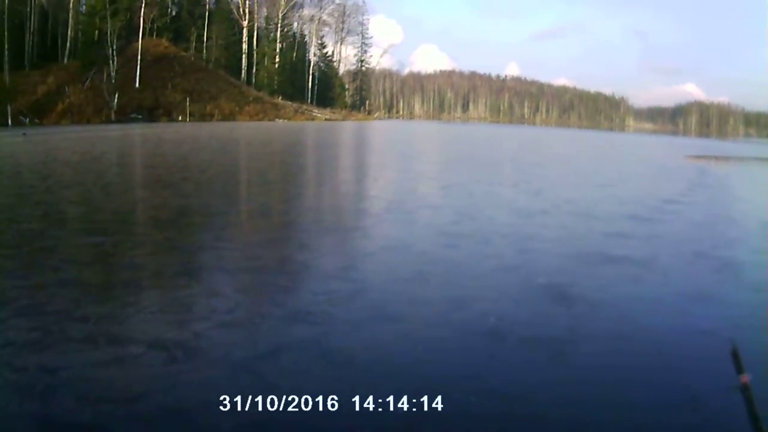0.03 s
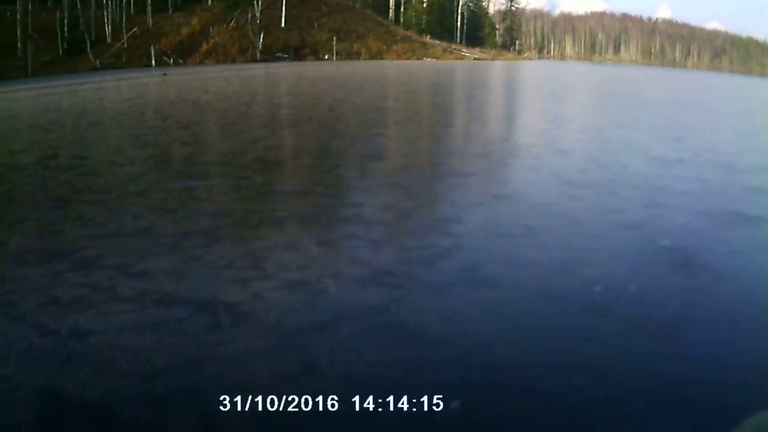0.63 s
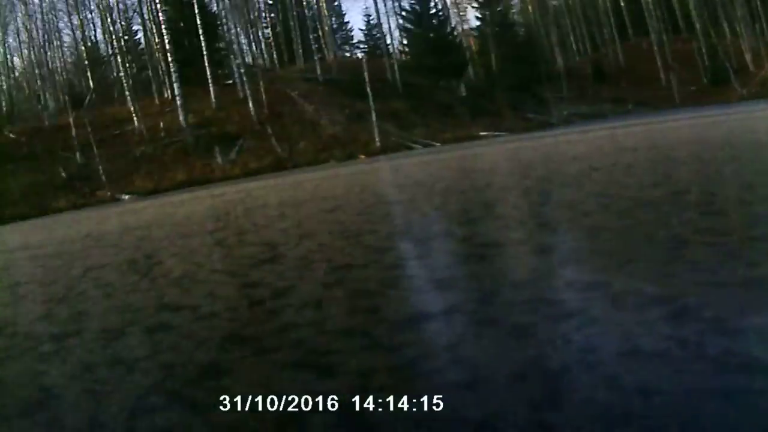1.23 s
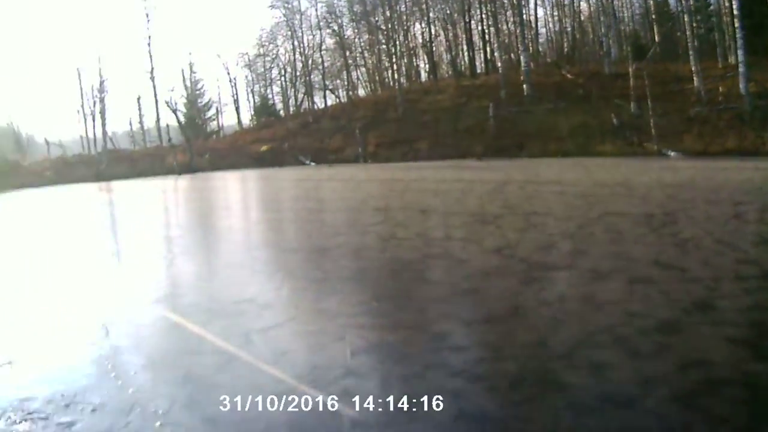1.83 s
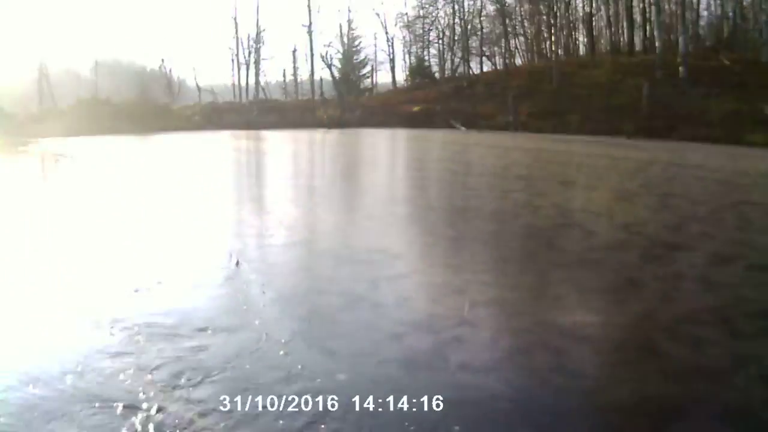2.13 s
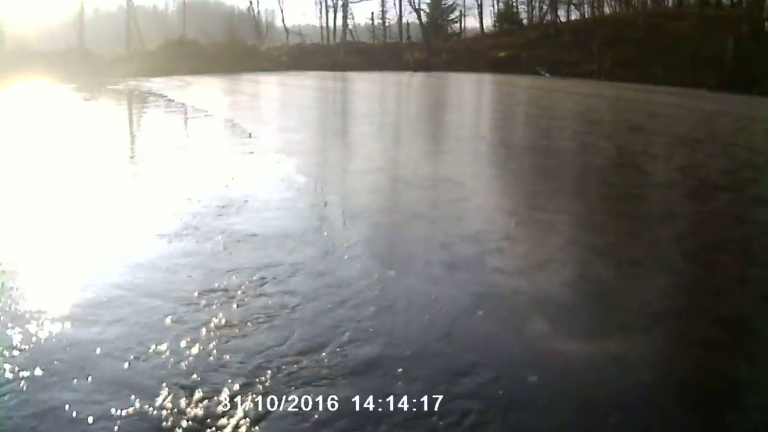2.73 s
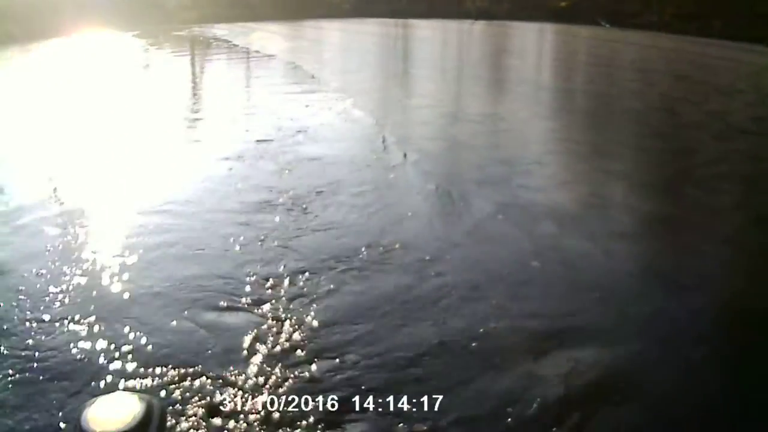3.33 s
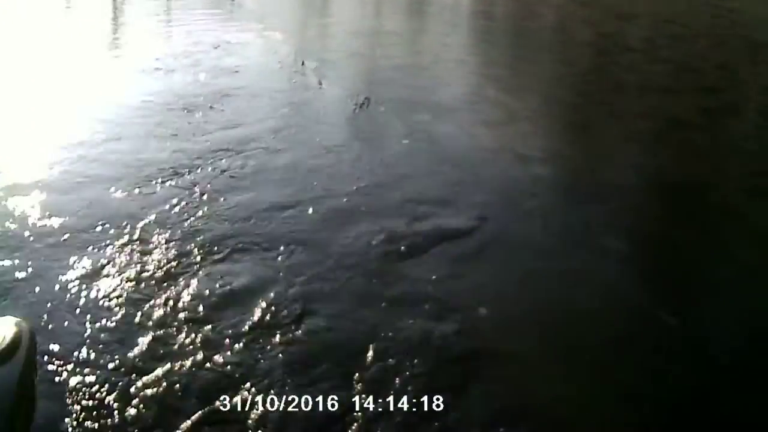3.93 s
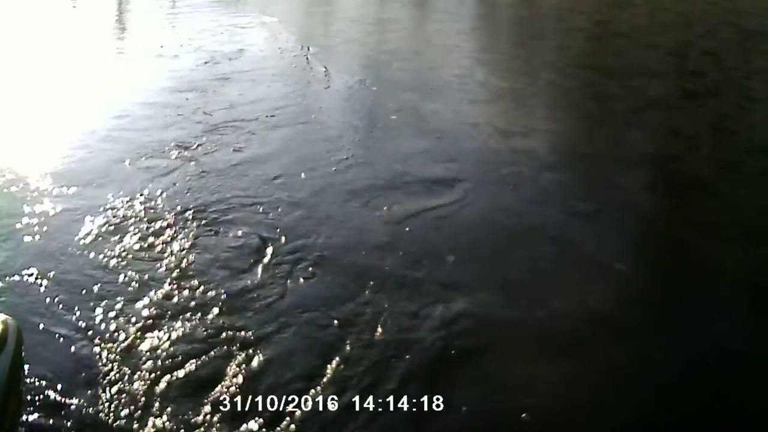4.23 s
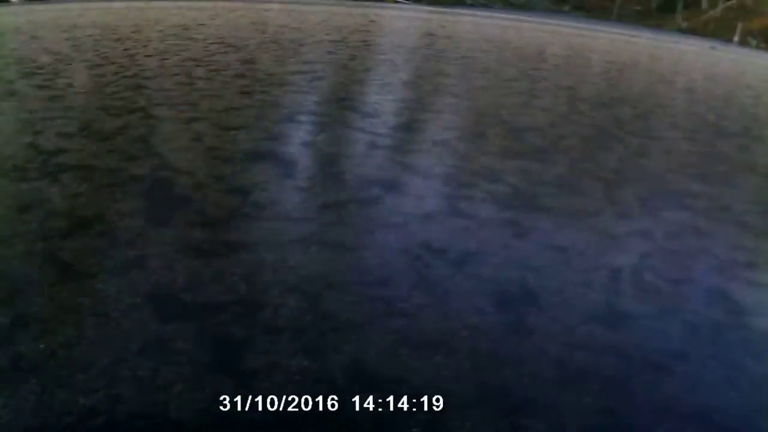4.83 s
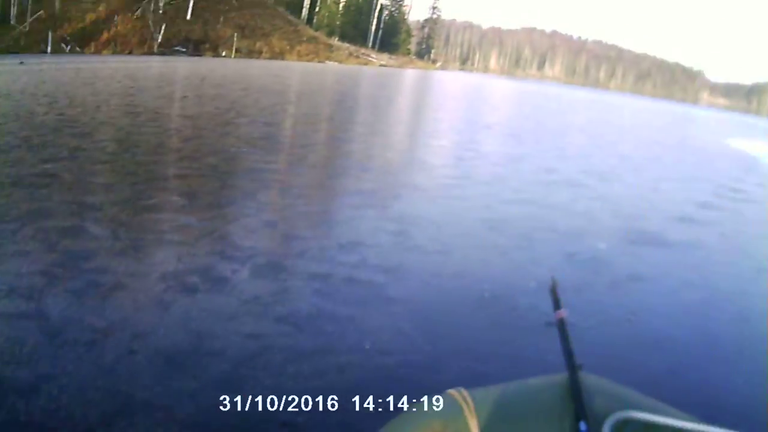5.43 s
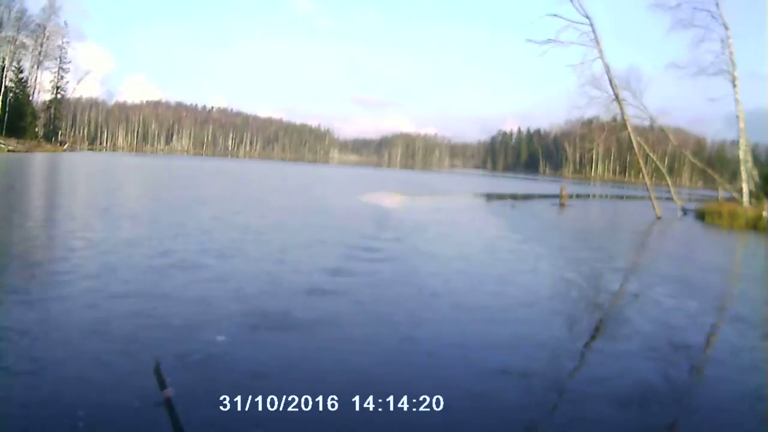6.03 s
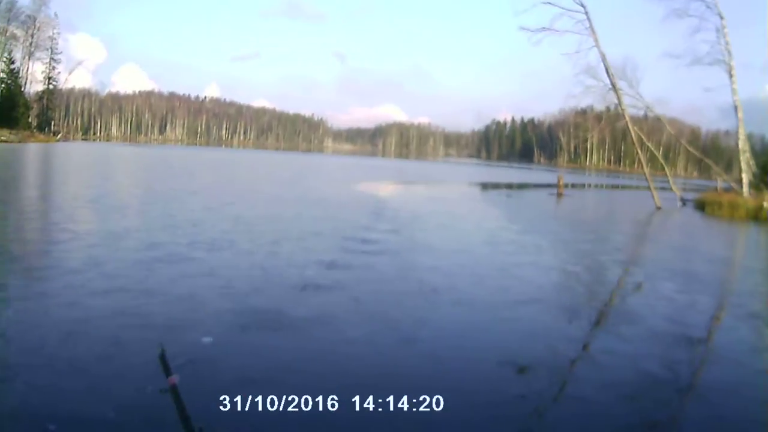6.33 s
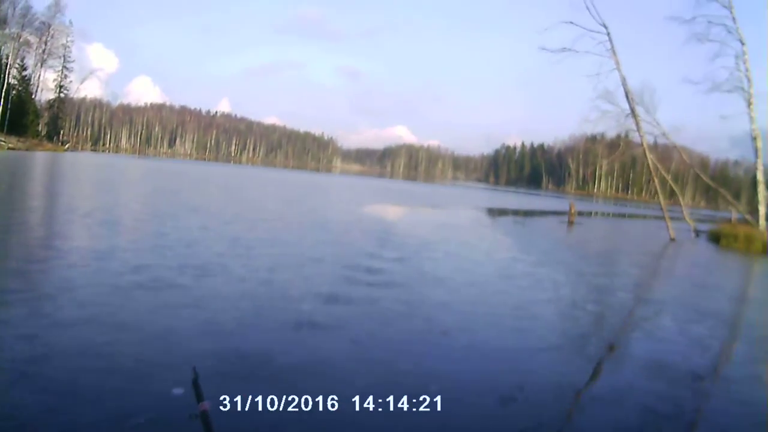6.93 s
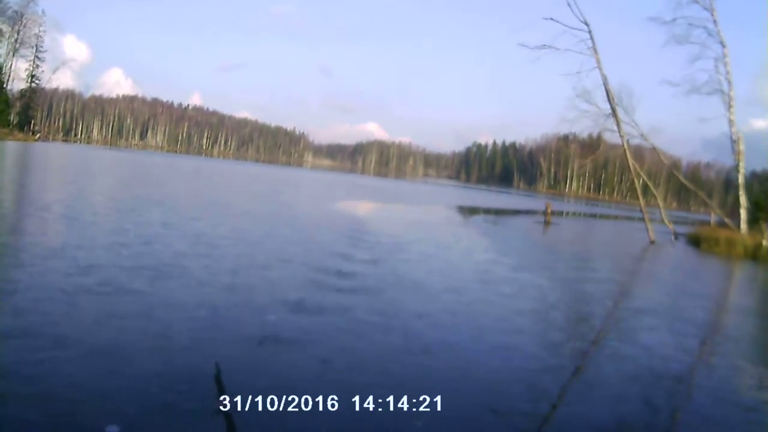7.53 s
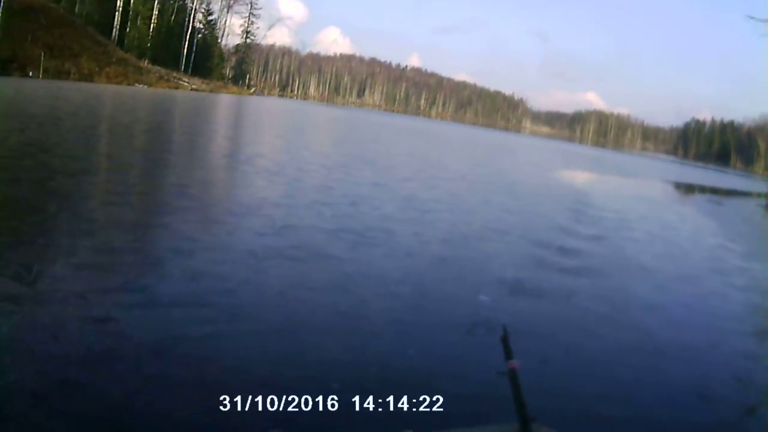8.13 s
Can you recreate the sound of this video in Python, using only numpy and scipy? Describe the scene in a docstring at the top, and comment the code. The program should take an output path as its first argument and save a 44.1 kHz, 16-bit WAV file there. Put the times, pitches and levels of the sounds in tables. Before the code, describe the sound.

Muffled crunching of thin ice and hollow thumps on an air-filled hull are heard from aboard a small boat on a lake. The crunch dies down as the quiet electric motor stops, and the wake bubbles. After a brief clothing rustle and a low buffet of air on the microphone, the hum resumes and the ice cracks and knocks harder. A faint electronic hiss lies underneath.

```python
"""Ice crunches and drums on an air-filled hull: an inflatable boat ploughs through a thinly frozen lake.
Its quiet electric motor hums, rests while the boat coasts, then spins up again.
The on-board camera swings astern and back: the wake gurgles, air buffets the case, a jacket rustles.
The closed case muffles ice and water above the midrange; the electronics hiss and tick faintly."""
import sys
import numpy as np
from scipy import signal
from scipy.fft import rfft, irfft
from scipy.io import wavfile

SR = 44100
rng = np.random.default_rng(int(sys.argv[2]) if len(sys.argv) > 2 else 0)


def dump_mix(stems):
    """Bounce the given channels to the path in sys.argv[1] as a 16-bit WAV at rate SR."""
    frames = np.atleast_2d(stems).T  # one column per channel
    limited = np.clip(frames, -1, 1)  # hard clip at full scale
    pcm = np.round(limited * 32767).astype(np.int16)
    wavfile.write(sys.argv[1], SR, pcm)


N = 360297
TIME = np.arange(N) / SR

# bow load on the ice, as crunch level: t/s, level/dB
ICE_LOAD = [(0, -47), (0.45, -50.5), (0.78, -51), (1.0, -50), (1.27, -53), (1.52, -49.5), (1.7, -54),
            (2.3, -60.5), (3.5, -71), (4.5, -62), (4.95, -55), (5.9, -51.5), (6.22, -53), (6.45, -49.5),
            (7.48, -47), (7.93, -55), (8.17, -47)]
# patches of ice giving way: centre t/s, length/s, level/dB
COLLAPSES = [(0.41, 0.086, -46), (4.9, .06, -55), (5.0, 0.04, -51), (5.18, .07, -52), (5.36, 0.11, -50.5),
             (7.16, 0.028, -46), (7.435, 0.034, -52)]
# fracture spectrum: f/Hz, gain/dB
CRUNCH_SPECTRUM = [(300, -10), (500, -7.5), (720, 0), (900, -0.5), (1080, 2), (1380, -1), (1600, -1.5),
                   (2000, -8), (2800, -4), (4500, -8.5), (6500, -30), (10000, -35), (16000, -26.5)]
# air-filled hull: f/Hz, width/Hz, gain/dB
HULL_MODES = [(93.2, 63, 0), (108, 34, -6.5), (171, 31, -9.5), (195, 62.5, 0.5), (258, 46.8, -1.5),
              (335, 85, -8), (426, 90, -10), (617, 122, -22.5)]
# slabs sliding under the hull: centre t/s, length/s, level/dB
SLABS = [(0.11, 0.098, -48), (0.62, 0.083, -41), (0.98, 0.086, -42), (4.06, 0.11, -56.5),
         (4.5, 0.063, -43.5), (4.68, 0.28, -52.5), (5.82, 0.16, -44.5), (6.55, 0.11, -39.5),
         (7.08, 0.45, -39.5), (7.8, 0.34, -45.5)]
# plates hitting the hull: t/s, peak before trim/dB
BUMPS = [(0.116, -35), (4.629, -35), (6.49, -36), (6.746, -33), (7.013, -30.5), (7.045, -32), (7.126, -30),
         (7.174, -27.5), (7.247, -26.5), (7.487, -27.5), (7.783, -25)]
# single cracks: t/s, peak/dB, f/Hz
CRACKS = [(0.442, -37, 950), (0.692, -35, 1090), (0.957, -36, 1210), (4.895, -34, 1200), (5.013, -38, 1070),
          (5.775, -34, 1090), (7.149, -30.5, 1650), (7.152, -30, 1240), (7.419, -32, 1170),
          (7.492, -37, 1370)]
# shards splintering: t/s, peak/dB, length/s
SPLINTERS = [(0.395, -46, .04), (0.97, -51, .12), (1.5, -50, .08), (1.87, -51, .06), (3.066, -52, .012),
             (5.9, -51, .03), (7.183, -47.5, .014), (7.42, -50, .03), (7.58, -50, .05)]
# water along the hull: f/Hz, gain/dB
WASH_SPECTRUM = [(100, 3.5), (250, 4.5), (450, 0.5), (700, -0.5), (1200, 4.5), (1600, 6), (3000, -3.5),
                 (8000, -6.5)]
# wake bubbles: t/s, peak/dB, f/Hz, t60/s
BUBBLES = [(2.889, -45, 774, .05), (2.965, -46.5, 624, .07), (3.062, -45, 1400, .03),
           (3.165, -43.5, 960, .05), (3.226, -47, 1500, .04), (3.306, -40, 745, .08),
           (3.358, -45, 900, .05), (3.393, -46.5, 1190, .04), (3.493, -48, 800, .06),
           (3.607, -42.5, 1200, .05), (3.719, -46.5, 1010, .05), (3.939, -46, 555, .08),
           (4.01, -46, 1000, .05), (4.231, -43, 1310, .07), (4.638, -42, 1080, .05)]
# churned water: f/Hz, width/Hz, gain/dB
CHURN_MODES = [(160, 57, 0), (364, 100, -0.5), (616, 200, -8.5)]
# breeze on the case: t/s, level/dB
BREEZE = [(0, -58), (1.9, -51), (2.25, -68), (2.7, -55), (3.9, -46.5), (5.4, -52), (8.17, -50)]
# wind rumble: f/Hz, gain/dB
WIND_SPECTRUM = [(20, 12), (45, 6), (80, 0), (130, -9.5), (200, -29), (400, -41), (600, -61), (2000, -66)]
# camera swings: centre t/s, length/s, air level/dB, hand level/dB
TURNS = [(1.702, 0.53, -46, -55), (4.46, 0.72, -40, -45)]
# hand-held case: f/Hz, width/Hz, gain/dB
CASE_MODES = [(45.3, 58, -4), (76.5, 34, -1), (127, 46, -3), (405, 51, -12.5)]
# jacket strokes: centre t/s, length/s, level/dB
RUBS = [(0.34, .12, -70), (1.1, 0.48, -66), (1.94, 0.25, -61), (2.13, 0.16, -62), (2.67, .08, -63),
        (3.89, 0.2, -52.5), (4.35, 0.21, -57)]
# cloth rustle: f/Hz, gain/dB
CLOTH_SPECTRUM = [(300, -16), (1200, 17.5), (1700, 11.5), (2300, -1), (2900, 0), (3500, 7.5), (4500, 1.5),
                  (7000, -3), (10000, -5.5), (12000, 0.5), (14500, 0), (15700, -5)]
# electronic hiss: f/Hz, gain/dB
HISS_SPECTRUM = [(100, -33), (1500, -18), (2100, 3), (2800, 9), (3500, 2), (5000, 1), (5600, 5.5),
                 (7100, 0.5), (8000, -2.5), (9600, 0.5), (11200, -18.5), (13800, -5.5), (15700, -48)]
# peaks in the hiss: f/Hz, width/Hz, gain/dB
HISS_HUMPS = [(6180, 230, -5), (6480, 180, -6.5), (8750, 280, -13.5)]
# electronic whine: f/Hz, rms level/dB
WHINE_TONES = [(2400, -82), (5743, -88), (5787, -87), (6421, -83), (7200, -93), (12812, -97)]
# spells of ticking: start/s, end/s, rate/Hz
TICK_SPELLS = [(1.68, 3.1, 14.9), (1.697, 3.1, 14.9), (3.15, 5.0, 29.9), (6.93, 8.15, 14.9)]

USUAL_LOAD_DB = -52.5


def ice(load_db, crunch_db=-2, chip_db=-5, chip_hz=(950, 1080, 1210, 1330, 1450), chip_width_hz=110):
    """Countless tiny fractures crunch under the bow; loose chips clink among them."""
    level = np.hypot(from_db(load_db), swells(COLLAPSES, steepness=1.8))
    fractures = grains(per_s=2500, spread_db=3.5, clump_db=2)
    crunch = rms_one(through_case(colour(fractures, CRUNCH_SPECTRUM)))
    chips = sum(resonate(grains(per_s=45, spread_db=1, clump_db=1.5), [(hz, chip_width_hz, 0)])
                for hz in chip_hz)
    return level * (from_db(crunch_db) * crunch + from_db(chip_db) * rms_one(through_case(chips)))


def hull(extra_load_db, drum_db=-47, load_slope=1.2, coast_db=-4, screened_db=-2.5,
         bump_trim_db=-2, contact_s=0.0065):
    """Shards drum on the hull, harder with load and over slabs, screened from astern; plates bump it."""
    steady_db = drum_db + load_slope * extra_load_db + coast_db * coasting() + screened_db * astern()
    level = np.hypot(from_db(steady_db), swells(SLABS, steepness=2.8))
    shards = grains(per_s=1000, spread_db=2, clump_db=2)
    out = level * rms_one(resonate(shards, HULL_MODES))
    t = TIME[:SR // 8]
    for s, db in BUMPS:
        scrape = rng.standard_normal(len(t)) * np.exp(-t / contact_s)
        add(out, s, db + bump_trim_db, resonate(butter(scrape, 2, 800), HULL_MODES))
    return out


def cracks(t60_s=0.015, snap_s=0.0014, snap_hz=(700, 1600)):
    """A big crack snaps and rings briefly."""
    out = np.zeros(N)
    for s, db, hz in CRACKS:
        ring = ping(hz, t60_s)
        snap = burst(len(ring), 3, snap_hz, snap_s)
        add(out, s, db, through_case(ring + snap))
    return out


def splinters(band_hz=(2300, 4600)):
    """Thin shards give way in quick runs of bright clicks."""
    out = np.zeros(N)
    clicks = butter(grains(per_s=900, spread_db=2, clump_db=0) + 1e-18, 2, band_hz, "band")
    for s, db, length_s in SPLINTERS:
        add(out, s, db, clicks[int(s * SR):int((s + length_s) * SR)])
    return out


def tink(at_s=1.416, peak_db=-51, hz=4850, t60_s=0.03):
    """Something small and hard rings once."""
    out = np.zeros(N)
    add(out, at_s, peak_db, ping(hz, t60_s))
    return out


def wake(wash_db=-58, splash_s=0.0036, splash_hz=(600, 1900), small_db=-57, small_count=60):
    """Water washes along the hull; bubbles pinch off with a splash and ring with rising pitch."""
    wash = colour(grains(per_s=3000, spread_db=2, clump_db=2.5), WASH_SPECTRUM)
    out = from_db(wash_db) * rms_one(through_case(wash))
    for s, db, hz, t60_s in BUBBLES:
        ring = ping(hz, t60_s, rise=0.047)
        splash = 0.9 * burst(len(ring), 2, splash_hz, splash_s)
        add(out, s, db, through_case(ring + splash))
    for when, pitch, strength in rng.random((small_count, 3)):  # fainter bubbles, heard astern
        hz = 520 * 3 ** pitch
        add(out, 2.1 + 2.7 * when, small_db + 6 * strength, ping(hz, t60_s=25 / hz, rise=0.08))
    return out


def propeller(churn_db=-57):
    """The running propeller churns the water, heard from astern."""
    churn = resonate(grains(per_s=1500, spread_db=-0.5, clump_db=1.5), CHURN_MODES)
    return from_db(churn_db) * astern() * (1 - coasting()) * rms_one(through_case(churn))


def motor(extra_load_db, hum_hz=164, hum_db=-60, load_slope=0.26, wander=0.0304, waver_db=2.5):
    """The submerged electric motor gives a wavering hum, louder under load."""
    hz = hum_hz * (1 + wander * drift(4.8))
    phase = 2 * np.pi * np.cumsum(hz) / SR
    level = from_db(hum_db + load_slope * extra_load_db + waver_db * drift(6))
    return (1 - coasting()) * level * np.sqrt(2) * np.sin(phase)


def wind(lump_db=1, low_cut_hz=12):
    """Eddies on the case give a lumpy rumble that swells as the camera swings."""
    eddies = rng.standard_normal(N) * from_db(lump_db * drift(3.3))
    rumble = butter(colour(eddies, WIND_SPECTRUM), 3, low_cut_hz, "high")
    rush = swells([(s, length_s, air_db) for s, length_s, air_db, _ in TURNS], steepness=2.1)
    return np.hypot(from_db(in_time(BREEZE)), rush) * rms_one(rumble)


def handling(stretch=1.02, lag_s=0.16, top_hz=700):
    """Fingers stick and slip on the case in dull thumps as the hand brakes each turn."""
    slips = resonate(grains(per_s=260, spread_db=1.5, clump_db=3.5), CASE_MODES)
    grips = [(s + lag_s, stretch * length_s, hand_db) for s, length_s, _, hand_db in TURNS]
    return swells(grips, steepness=1.7) * rms_one(butter(slips, 2, top_hz))


def jacket():
    """Smooth threads slip over each other in a fine, bright rustle."""
    threads = grains(per_s=9000, spread_db=3, clump_db=1.2)
    return swells(RUBS, steepness=2.1) * rms_one(colour(threads, CLOTH_SPECTRUM))


def electronics(hiss_db=-66, hump_db=-69, wobble_rad=1.9,
                tick_db=-56, tick_s=0.0017, upper_hz=12520, lower_hz=10600):
    """Steady coloured hiss, a thin whine and spells of tiny two-tone ticks."""
    out = from_db(hiss_db) * rms_one(colour(rng.standard_normal(N), HISS_SPECTRUM))
    out += from_db(hump_db) * rms_one(resonate(rng.standard_normal(N), HISS_HUMPS))
    for hz, db in WHINE_TONES:
        out += from_db(db) * np.sqrt(2) * np.sin(2 * np.pi * hz * TIME + wobble_rad * drift(2.7))
    t = TIME[:int(tick_s * SR)]
    partials = np.sin(2 * np.pi * upper_hz * t) + from_db(-3) * np.sin(2 * np.pi * lower_hz * t)
    tick = np.hanning(len(t)) * partials
    for start_s, end_s, rate_hz in TICK_SPELLS:
        for s in np.arange(start_s, min(end_s, TIME[-1] - 0.02), 1 / rate_hz):
            add(out, s + 0.0004 * rng.normal(), tick_db + 1.8 * rng.normal(), tick)
    return out


def coasting(off_s=2.6, on_s=3.99, stop_s=0.033, spin_up_s=0.67):
    """1 with the motor off, 0 at full speed."""
    return np.clip(np.minimum((TIME - off_s) / stop_s, 1 - (TIME - on_s) / spin_up_s), 0, 1)


def astern(from_s=1, to_s=4.85, swing_s=0.36):
    """1 with the camera facing the stern, 0 facing the bow."""
    return np.clip(np.minimum(TIME - from_s, to_s - TIME) / swing_s + 0.5, 0, 1)


def through_case(x, cutoff_hz=1563, leak_hz=2300, leak_db=-14):
    """The case passes lows and mids; a little treble leaks in."""
    return butter(x, 10, cutoff_hz) + from_db(leak_db) * butter(x, 3, leak_hz, "high")


def grains(per_s, spread_db, clump_db):
    """Random clicks of uneven size, swelling in clumps."""
    born = rng.random(N) < per_s / SR
    size_db = spread_db * np.minimum(rng.exponential(1, N), 4) + clump_db * drift(19)
    return born * from_db(size_db) * rng.choice([-1, 1], N)


def ping(hz, t60_s, rise=0):
    """Decaying sine; pitch climbs by the fraction `rise`."""
    t = TIME[:int(t60_s * SR) + 2]
    return np.sin(2 * np.pi * hz * t * (1 + rise * t / t60_s / 2)) * from_db(-60 * t / t60_s)


def burst(samples, order, band_hz, decay_s):
    """Decaying band of noise."""
    noise = butter(rng.standard_normal(samples), order, band_hz, "band")
    return rms_one(noise) * np.exp(-TIME[:samples] / decay_s)


def drift(rate_hz, hop=40, settle=2000):
    """Slow random wander, unit rms."""
    r = np.exp(-2 * np.pi * rate_hz * hop / SR)
    noise = rng.standard_normal(N // hop + settle + 2)
    slow = signal.lfilter([1], [1, -2 * r, r * r], noise)[settle:]
    return np.interp(np.arange(N) / hop, np.arange(len(slow)), rms_one(slow))


def colour(x, spectrum):
    """Minimum-phase filter with the given spectrum."""
    hz, db = np.transpose(spectrum)
    grid_hz = np.linspace(0, SR / 2, 4097)
    gain = from_db(np.interp(np.log(grid_hz + 1), np.log(hz), db))
    cepstrum = irfft(np.log(gain))
    cepstrum[1:len(grid_hz) - 1] *= 2
    cepstrum[len(grid_hz):] = 0
    return signal.fftconvolve(x, irfft(np.exp(rfft(cepstrum))))[:N]


def resonate(x, modes):
    """Parallel resonances of alternating sign."""
    out = 0
    for k, (hz, width_hz, db) in enumerate(modes):
        r = np.exp(-np.pi * width_hz / SR)
        gain = (-1) ** k * from_db(db) * (1 - r * r) / 2
        feedback = [1, -2 * r * np.cos(2 * np.pi * hz / SR), r * r]
        out = out + signal.lfilter([gain, 0, -gain], feedback, x + 1e-18)
    return out


def butter(x, order, hz, kind="low"):
    """Maximally flat filter."""
    return signal.sosfilt(signal.butter(order, hz, kind, fs=SR, output="sos"), x)


def swells(rows, steepness):
    """Gain curve of rounded swells, summed in power."""
    power = 0
    for s, length_s, db in rows:
        falloff = np.minimum(np.abs(2 * (TIME - s) / length_s) ** steepness, 20)
        power += (from_db(db) * np.exp(-falloff)) ** 2
    return np.sqrt(power)


def add(out, s, peak_db, sound):
    """Mix a sound in at a given time and peak."""
    at = max(int(s * SR), 0)
    out[at:at + len(sound)] += (from_db(peak_db) * sound / np.abs(sound).max())[:N - at]


def in_time(rows):
    """Breakpoints to a per-sample curve."""
    return np.interp(TIME, *np.transpose(rows))


def from_db(db):
    """Decibels to gain."""
    return 10 ** (np.asarray(db) / 20)


def rms_one(x):
    """Scale to unit rms."""
    return x / np.sqrt(np.mean(x ** 2) + 1e-20)


def scene():
    """Bow, stern and the small sounds at the camera, in mono."""
    load_db = in_time(ICE_LOAD)
    extra_load_db = load_db - USUAL_LOAD_DB
    bow = hull(extra_load_db) + ice(load_db) + cracks() + splinters() + tink()
    stern = wake() + motor(extra_load_db) + propeller()
    return (bow + stern + wind() + handling() + jacket() + electronics())[None]


def record(dry, cutoff_hz=15750, dc_offset=-0.0167):
    """The converter cuts the top steeply and sits slightly off zero."""
    return dc_offset + signal.sosfilt(signal.ellip(12, 0.1, 70, cutoff_hz, fs=SR, output="sos"), dry)


dry = scene()
out = record(dry)
dump_mix(out)
```